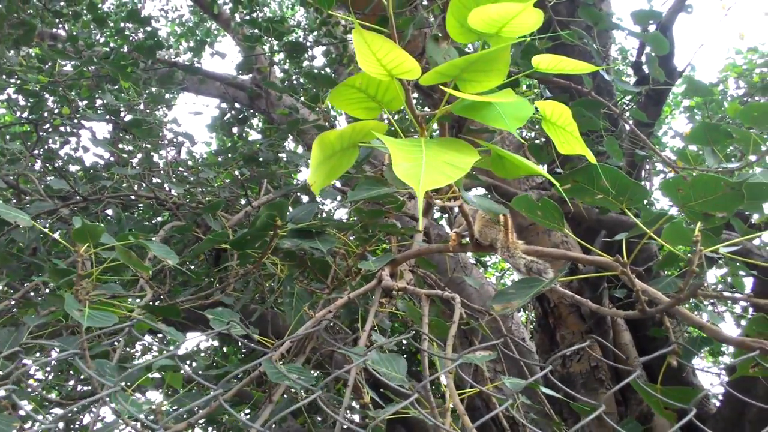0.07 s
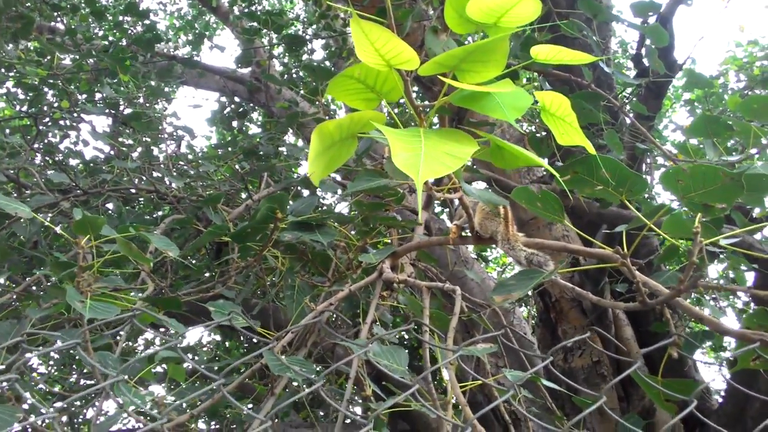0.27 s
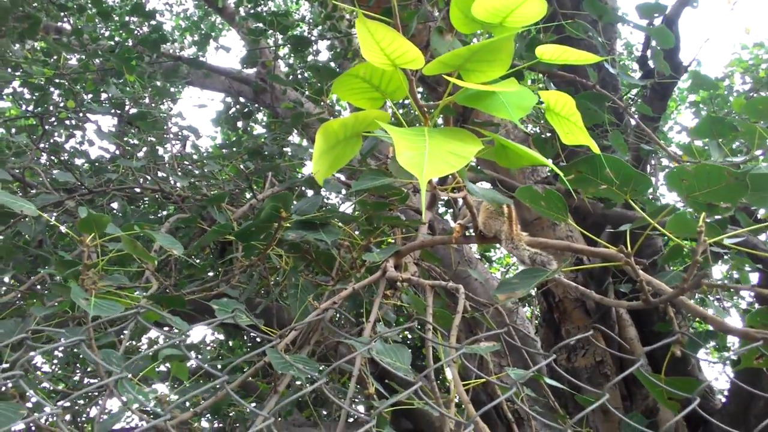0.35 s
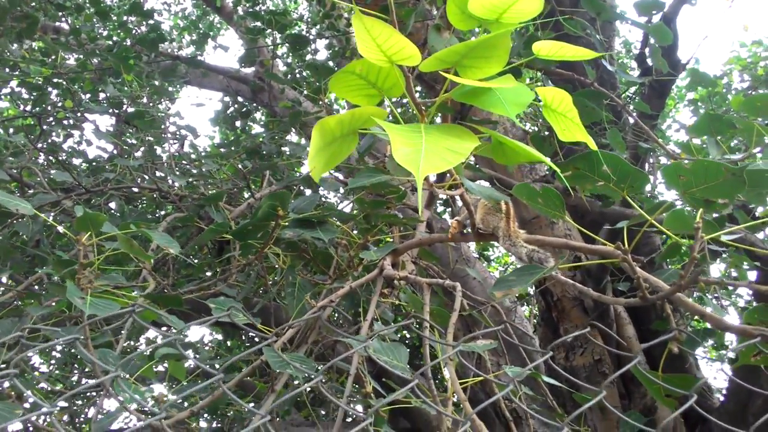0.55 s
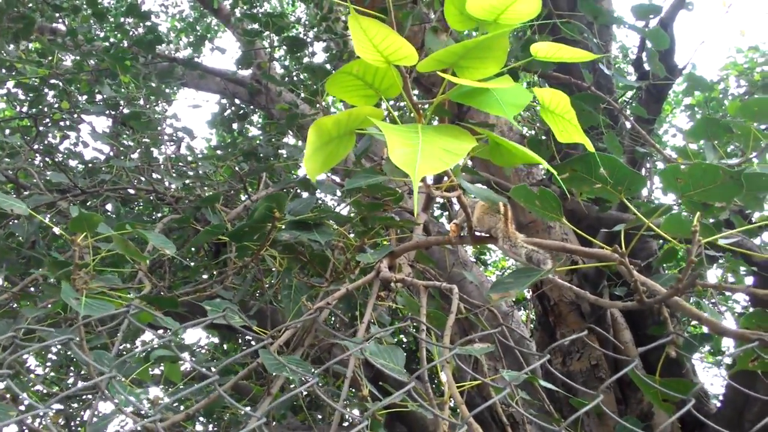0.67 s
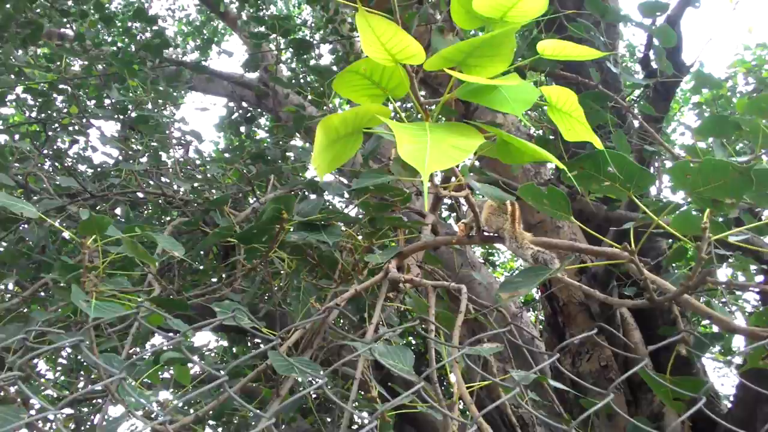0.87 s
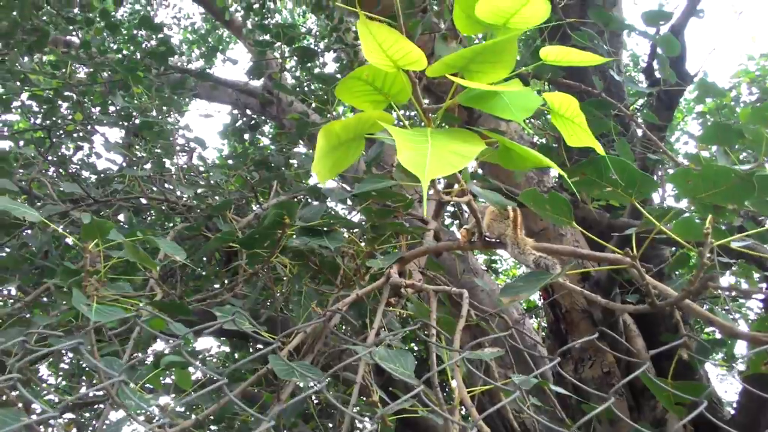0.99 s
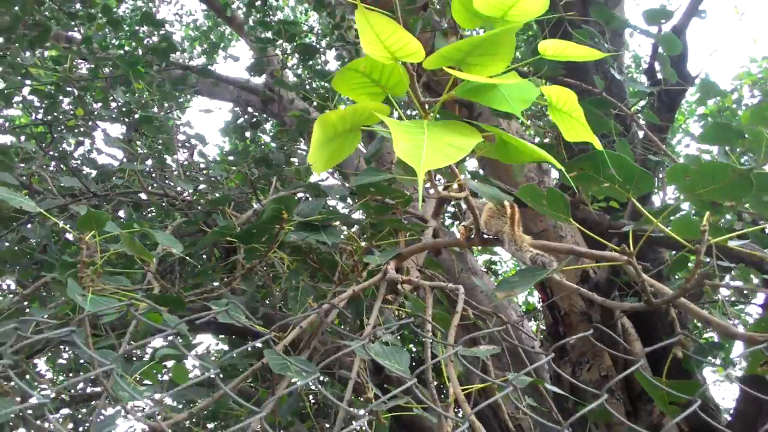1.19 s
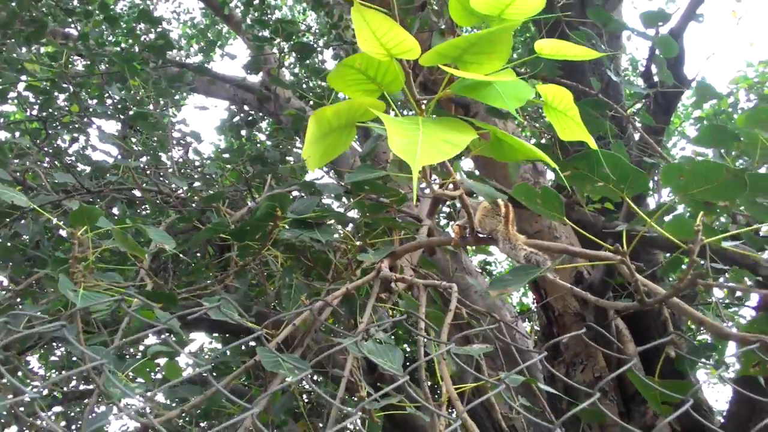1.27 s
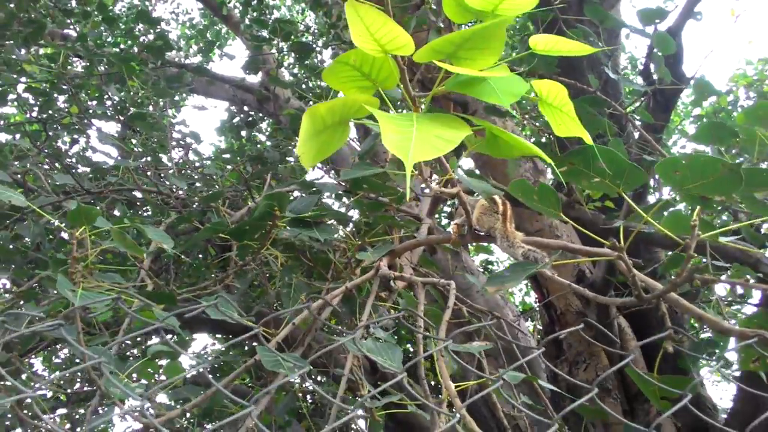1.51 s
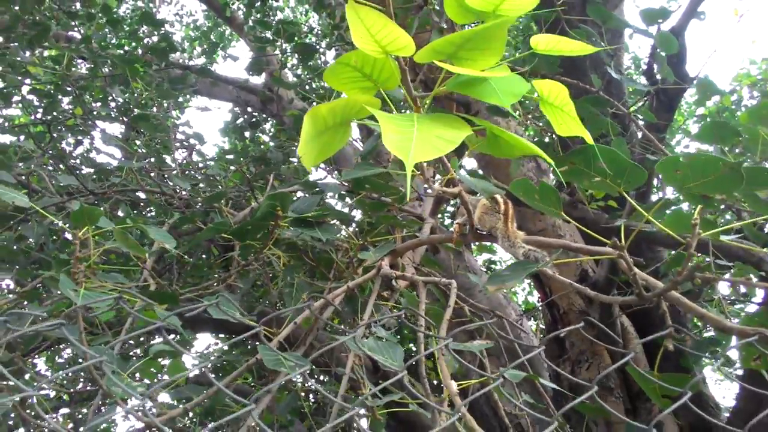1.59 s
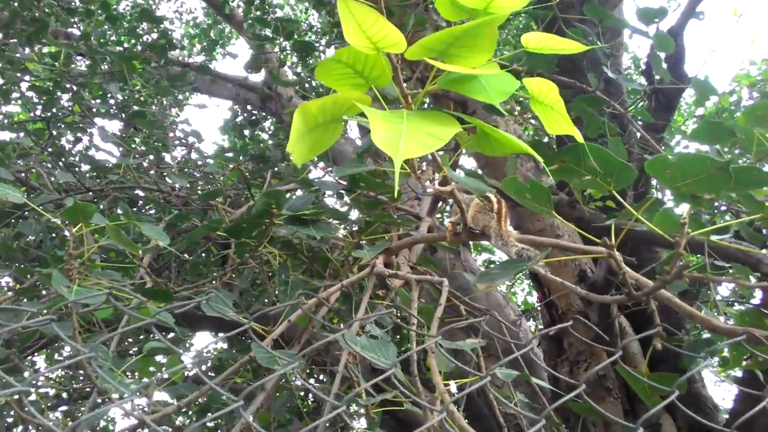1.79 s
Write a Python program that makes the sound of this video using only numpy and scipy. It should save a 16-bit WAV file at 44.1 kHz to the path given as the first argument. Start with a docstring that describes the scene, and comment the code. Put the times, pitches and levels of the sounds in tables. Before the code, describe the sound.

A crow gives two harsh, raspy caws among trees, with faint falling bird whistles between and after.

```python
"""Crows, whistles and coos among trees

A crow caws twice from a tree and another calls far off: pulsed membrane partials and noise through a throat. A
small bird whistles falling glides and a dove coos, as bending sine tones. Two more faint tones sound: a thin,
very high line and, as the second caw begins, a steady 4.4 kHz ring from the crow's nearly shut beak. Leaves and
trunks scatter all of these into a dense noise tail. Under them lie a distant engine hum (narrow noise), a dull
low rumble and outdoor hiss (coloured noise)."""
import sys
import numpy as np
from scipy import signal
from scipy.fft import rfft, irfft
from scipy.io import wavfile

SR = 44100
rng = np.random.default_rng(int(sys.argv[2]) if len(sys.argv) > 2 else 0)


def amplitude_ratio(level_db):
    """Convert a level in decibels to the matching linear amplitude (field) ratio."""
    exponent = np.asarray(level_db, float) / 20
    return 10 ** exponent


def generate_wav(sig):
    """Save sig (samples, or channels by samples) to the path in sys.argv[1] as 16-bit PCM at SR."""
    pcm = np.round(np.clip(np.atleast_2d(sig).T, -1, 1) * 32767).astype(np.int16)
    wavfile.write(sys.argv[1], SR, pcm)


N = 81585


def rms_one(x):
    """Scale to unit rms."""
    return x / np.sqrt(np.mean(x ** 2) + 1e-20)


def at_hz(points, hz):
    """Interpolate a table over log frequency."""
    f_hz, value = np.transpose(points)
    return np.interp(np.log(np.maximum(hz, 1)), np.log(f_hz), value)


def in_time(rows):
    """Columns joined by lines in time, then a gate open only within the table."""
    s, *columns = np.transpose(rows)
    t = np.arange(N) / SR
    return [np.interp(t, s, c) for c in columns] + [(t >= s[0]) & (t <= s[-1])]


def drift(rate_hz):
    """Unit-rms noise through a two-pole lowpass."""
    r = np.exp(-2 * np.pi * rate_hz / SR)
    settled = signal.lfilter([1], [1, -2 * r, r * r], rng.standard_normal(N + SR))[SR:]
    return rms_one(settled)


def phase_of(hz):
    """Phase in radians: the running integral of frequency."""
    return 2 * np.pi * np.cumsum(hz) / SR


def colour(x, spectrum):
    """Filter by a table of gain over frequency."""
    return irfft(rfft(x) * amplitude_ratio(at_hz(spectrum, np.fft.rfftfreq(N, 1 / SR))), N)


def bandpass(x, low_hz, high_hz):
    """Butterworth bandpass."""
    return signal.sosfilt(signal.butter(2, [low_hz, high_hz], "band", fs=SR, output="sos"), x)


# hiss spectrum: f/Hz, relative gain/dB
AIR_SPECTRUM = [(15, -38), (30, -12.5), (80, -8), (126, -6.5), (171, -5.5), (290, -12.5), (600, -12.5),
                (1170, -16.5), (1830, -14.5), (3100, -20), (4980, -22), (6050, -6), (8000, -28),
                (9500, -33.5), (11500, -37.5), (14000, -34), (16000, -35)]
# hiss correlation between channels: f/Hz, likeness/-1..1
AIR_LIKENESS = [(30, .99), (150, .995), (300, .9), (600, .9), (1500, .9), (4000, .75), (9000, .1),
                (16000, -.1)]


def air():
    """Steady outdoor hiss, less alike in both channels towards the treble."""
    level_db = -51
    alike = np.clip(at_hz(AIR_LIKENESS, np.fft.rfftfreq(N, 1 / SR)), -1, 1)
    mid, side = rfft(rng.standard_normal((2, N)))
    pair = irfft(np.sqrt(1 + alike) * mid + np.sqrt(1 - alike) * side * [[1], [-1]], N)
    return amplitude_ratio(level_db) * rms_one(colour(pair, AIR_SPECTRUM))


# engine fundamental: t/s, level/dB
HUM = [(0.0, -63), (0.036, -45), (0.06, -60), (0.448, -65.5), (0.474, -49), (0.608, -61), (0.644, -53),
       (1.076, -53), (1.102, -53), (1.436, -58), (1.534, -44.5), (1.586, -46.5), (1.808, -58.5),
       (1.85, -63)]


def engine():
    """Firing-rate tone and its octave, each spread into narrow noise; the octave's set level is constant."""
    firing_hz, width_hz, octave_db = 81.2, 3.9, -65
    level_db, _ = in_time(HUM)
    t, out = np.arange(N) / SR, 0
    for k, gain_db in ((1, level_db), (2, octave_db)):
        carrier = np.exp(2j * np.pi * k * firing_hz * t)
        wander = 0.98 + drift(k * width_hz) + 1j * drift(k * width_hz)
        out = out + amplitude_ratio(gain_db) * rms_one(np.real(carrier * wander))
    return out


def rumble():
    """One dull low rumble: band noise with a short onset and exponential decay."""
    start_s, level_db, t60_s, attack_s = 1.475, -47.5, 0.91, 0.016
    since_s = np.arange(N) / SR - start_s
    low = rms_one(bandpass(rng.standard_normal(N), 35, 87))
    return low * amplitude_ratio(level_db - 60 * np.abs(since_s) / t60_s) * np.clip(since_s / attack_s, 0, 1)


# foliage decay before the extra late loss: f/Hz, T60/s
TAIL_T60 = [(300, 0.66), (900, 0.36), (2000, 0.79), (3000, 0.78), (4300, 0.76), (6500, 0.82), (10000, 0.77)]
# opposed part of the tail re common part: f/Hz, level/dB
TAIL_UNLIKE = [(200, -34.5), (700, -22.5), (3000, -19.5), (6000, -57), (10000, -6)]


def foliage(rise_s):
    """Stereo response of dense leaf and trunk echoes: noise that builds up, then dies band by band."""
    late_s = 0.49  # a further 20 dB lost by then, growing as time squared
    t, out = np.arange(SR) / SR, 0
    edges_hz = 150 * 2 ** np.arange(0, 7.1, .5)
    noise = rng.standard_normal((2, SR))
    for low, high in zip(edges_hz, edges_hz[1:]):
        hz = np.sqrt(low * high)
        mid, side = bandpass(noise, low, high)
        band = mid + amplitude_ratio(at_hz(TAIL_UNLIKE, hz)) * side * np.array([[1], [-1]])
        decay_db = -60 * t / at_hz(TAIL_T60, hz) - 20 * (t / late_s) ** 2
        band = band * amplitude_ratio(decay_db) * (1 - np.exp(-t / rise_s))
        # energy by bandwidth, near 1 in all
        out = out + band * np.sqrt((high - low) / np.sum(band[0] ** 2) / edges_hz[-1])
    return out


def among_trees(x, direct_db, rise_s):
    """Direct sound plus the scattered tail."""
    tail = signal.fftconvolve(x[None], foliage(rise_s), axes=1)[:, :N]
    return amplitude_ratio(direct_db) * x + tail


# coos, level before the space: start/s, length/s, f/Hz, fall/Hz, level/dB
COOS = [(0.273, 0.25, 535.7, 13, -44), (0.457, 0.043, 599, -2, -43.5), (0.551, 0.12, 604, -9.5, -68),
        (0.646, 0.018, 650, 5, -44), (0.711, 0.079, 545, 16, -56), (0.875, 0.039, 522, -10, -44.5),
        (0.882, 0.071, 649, -40, -59.5), (0.958, 0.019, 430, -13, -55.5), (1.006, .05, 611, 13, -42.5),
        (1.073, 0.013, 690, 7, -43.5)]


def dove():
    """Soft, slightly bending sine tones with rounded ends."""
    edge_s = 0.0075
    t, out = np.arange(N) / SR, 0
    for start, length, hz, fall, level_db in COOS:
        shape = np.clip(np.minimum(t - start, start + length - t) / edge_s + .5, 0, 1)
        pitch_hz = hz - fall * np.clip((t - start) / length, 0, 1)
        tone = np.sqrt(2) * np.sin(phase_of(pitch_hz))
        out = out + amplitude_ratio(level_db) * np.sin(np.pi / 2 * shape) ** 2 * tone
    return out


# one table per tone, level before the space: t/s, f/Hz, level/dB # the first is a faint, thin, very high line;
# the fifth a faint, steady 4.4 kHz ring of the near # crow's nearly shut beak as its second caw begins; the
# others are the small bird's whistles
TONES = [
    [(.24, 11300, -92.5), (.3, 11350, -54.5), (.42, 11500, -68), (.47, 11500, -75.5)],
    [(.664, 6230, -76), (.678, 6135, -13), (.695, 5880, -32), (.715, 5480, -23.5), (.73, 5200, -36.5),
     (.745, 4600, -22), (.758, 4150, -31.5), (.778, 3790, -24.5), (.8, 3670, -37), (.83, 3250, -39.5),
     (.865, 2705, -35.5), (.88, 2750, -54)],
    [(.85, 3300, -56.5), (.862, 3250, -16), (.885, 3080, -27), (.9, 3200, -28.5), (.91, 3200, -64.5)],
    [(.96, 4150, -26.5), (.968, 3900, -33.5), (.98, 3500, -22), (.995, 3150, -19), (1.015, 2850, -19),
     (1.04, 2750, -29), (1.06, 3115, -34.5), (1.1, 2923, -33), (1.125, 3070, -48.5)],
    [(.995, 4300, -38), (1.02, 4380, -35), (1.07, 4410, -42), (1.1, 4250, -62.5)],
    [(1.042, 6380, -46.5), (1.054, 6266, -7.5), (1.07, 5888, -26), (1.088, 5580, -31.5), (1.11, 4880, -29),
     (1.145, 3916, -33), (1.18, 3020, -23.5), (1.2, 2900, -44)],
    [(1.384, 6550, -49), (1.394, 6430, -8), (1.408, 5800, -14.5), (1.42, 5350, -20.5), (1.435, 4810, -24),
     (1.465, 4070, -28.5), (1.478, 3850, -26), (1.495, 3470, -29.5), (1.515, 3146, -48), (1.535, 3110, -32)],
]


def high_tones():
    """Whistles and two faint tones: sines on pitch curves, unsteady in pitch and level."""
    warble_share, grain_db = 0.00601, 2.5
    out = 0
    for rows in TONES:
        hz, level_db, gate = in_time(rows)
        tone = np.sqrt(2) * np.sin(phase_of(hz * (1 + warble_share * drift(52.4))))
        out = out + amplitude_ratio(level_db + grain_db * drift(55.0)) * gate * tone
    return out


# colour of the nearly shut beak: f/Hz, gain/dB
SHUT_BEAK = [(700, 3.5), (1000, 5), (1400, 11), (1800, 2), (2300, 0.5), (2700, -26), (3800, -29),
             (4350, -6), (4900, -29), (5700, -13.5), (6500, 0.5), (7200, 1), (7900, -7), (8500, -28.5)]


def caw(rows, throat):
    """Membrane partials and per-cycle noise puffs, fluttered by a slower rattle, through beak and throat."""
    jitter_share, shimmer_db = 0.00811, 0.5
    rattle_hz, rattle_wander_share = 81.12, 0.0423
    rattle_depth, bend_share, bend_lead_rad = 0.2, .032, 1.035
    hz, level_db, noisy, opening, gate = in_time(rows)
    noisy, opening = np.clip(noisy, 0, 1), np.clip(opening, 0, 1)

    # second, slower membrane flutter: moves level and pitch
    rattle = phase_of(rattle_hz * (1 + rattle_wander_share * drift(11.0)))
    bend = bend_share * np.cos(rattle + bend_lead_rad)
    phase = phase_of(hz * (1 + jitter_share * drift(112.0) + bend))
    turns = rng.uniform(0, 2 * np.pi, 24)
    partials = rms_one(sum(np.cos(k * phase + turn) for k, turn in enumerate(turns, 1)))
    puffs = rms_one(rng.standard_normal(N) * (0.88 + np.cos(phase)))

    source = np.sqrt(1 - noisy) * partials + np.sqrt(noisy) * puffs
    source = source * (1 + rattle_depth * np.cos(rattle)) * amplitude_ratio(shimmer_db * drift(45.))
    voiced = source * amplitude_ratio(level_db) * gate
    beak = voiced * opening + colour(voiced * (1 - opening), SHUT_BEAK)
    return colour(beak, throat) / np.std(colour(source, throat))


# one table per far caw, level before the space: t/s, f/Hz, level/dB, noise share/0-1, beak opening/0-1
FAR_CAWS = [
    [(0, 458, -33, 0.9, 1), (.02, 433.2, -35, 0, 1), (.04, 475, -56, 0.2, .9)],
    [(1.67, 469.8, -64.5, 0.9, 1), (1.72, 468.6, -41, 0.6, 0.3), (1.77, 459, -37.5, 0.4, 1),
     (1.81, 484, -38.5, 0.5, 0.4), (1.85, 475.6, -46, 0, 0.6)],
]
# far crow spectrum: f/Hz, relative gain/dB
FAR_THROAT = [(710, -68), (1200, -48), (1400, -28.5), (1670, -26.5), (1860, -9.5), (2050, -5),
              (2250, -22.5), (2550, -10), (2780, -28), (3850, -31), (5210, -34), (6900, -17), (7500, -31),
              (8000, -34), (10400, -70), (17600, -120)]


def far_crow():
    """Membrane caws with the distant crow's spectrum."""
    return sum(caw(rows, FAR_THROAT) for rows in FAR_CAWS)


# one table per near caw, level before the space: t/s, f/Hz, level/dB, noise share/0-1, beak opening/0-1
CAWS = [
    [(.165, 425, -47, 0.1, 0.05), (.185, 432.2, -33.5, 0.4, 0.2), (.215, 436, -22.5, 0.85, 0.24),
     (.25, 451.2, -21, 0.18, 0.79), (.33, 451.4, -20, 0.47, 1), (.36, 430.3, -19.5, 0.3, 0.93),
     (.41, 417, -23, 0.73, 1), (.44, 405, -22, 0.7, 0.5), (.47, 426, -49, 1, .7)],
    [(.96, 430.6, -72.5, 0.82, 0.06), (1.0, 430.7, -42, 0.6, 0), (1.03, 421.7, -27, 0.8, 0.3),
     (1.07, 433.9, -20.5, 0.9, .3), (1.11, 442.7, -17.5, 0.81, 0.75), (1.16, 446.9, -17.5, 0.29, .95),
     (1.21, 426.2, -18, 0.5, 0.99), (1.245, 378.9, -23, .2, 1), (1.265, 358, -31, .3, 1),
     (1.29, 337, -60, 0, 0.8)],
]
# near crow spectrum: f/Hz, relative gain/dB
THROAT = [(410, -62), (660, -24), (760, -18.5), (900, -12), (1000, -19), (1120, -27.5), (1290, -21.5),
          (1510, -10), (1780, -1), (1970, -5), (2280, -8.5), (2420, -11.5), (2540, -26), (2760, -18.5),
          (3050, -32), (3400, -22.5), (3800, -23.5), (4300, -10.5), (4750, -14.5), (5250, -14.5),
          (5650, -14), (6000, -3.5), (6300, -5.5), (6700, 0.5), (7300, -10.5), (7800, -19.5), (9000, -27),
          (9600, -34), (10000, -73.5), (22000, -120)]


def near_crow():
    """Two membrane caws through the near crow's throat."""
    return sum(caw(rows, THROAT) for rows in CAWS)


def scene():
    """All voices in their space; calls reach the right side slightly first."""
    left_lag_s = 2.3e-5
    birds = among_trees(dove(), direct_db=-2.5, rise_s=0.011)
    birds = birds + among_trees(high_tones(), direct_db=-21, rise_s=.009)
    birds = birds + among_trees(far_crow() + near_crow(), direct_db=-5.5, rise_s=0.0029)
    # half the lag each way
    lag = np.exp(-1j * np.pi * np.fft.rfftfreq(N, 1 / SR) * left_lag_s * np.array([[1], [-1]]))
    return air() + engine() + rumble() + irfft(rfft(birds) * lag, N)


def roll_off(x):
    """The treble ends steeply here."""
    return signal.sosfilt(signal.butter(12, 15750, fs=SR, output="sos"), x)


def record(dry):
    """Finished stereo output of the mix."""
    return roll_off(dry)


dry = scene()
out = record(dry)
generate_wav(out)
```